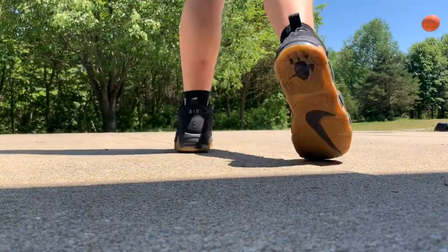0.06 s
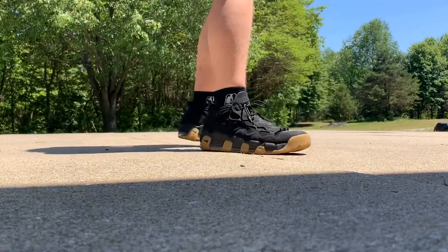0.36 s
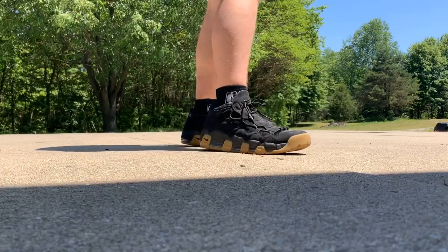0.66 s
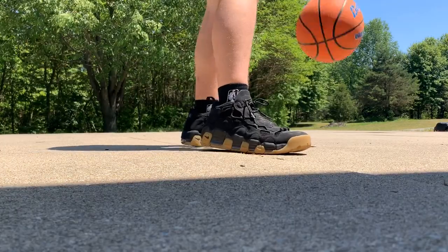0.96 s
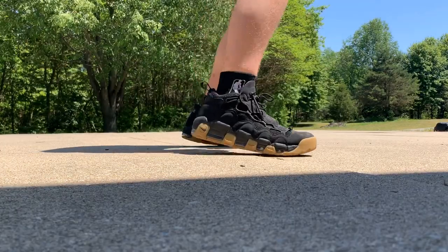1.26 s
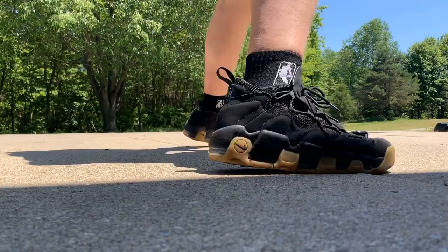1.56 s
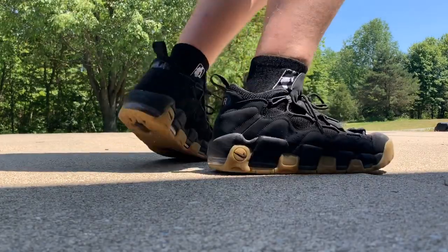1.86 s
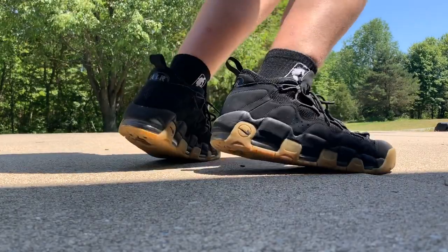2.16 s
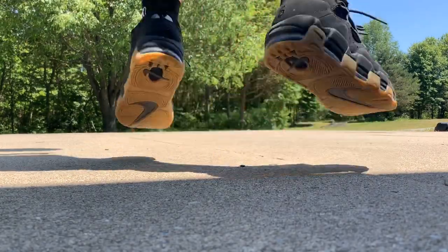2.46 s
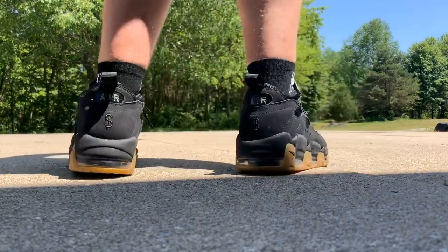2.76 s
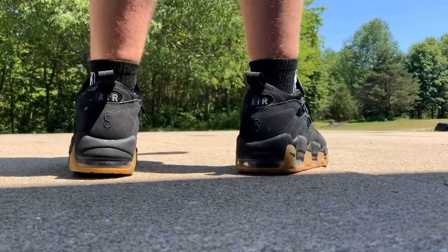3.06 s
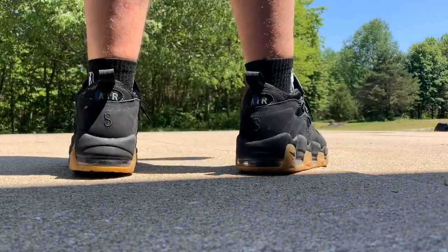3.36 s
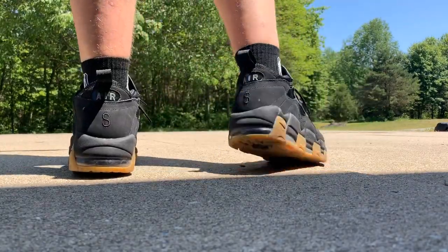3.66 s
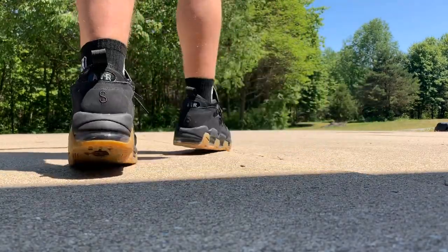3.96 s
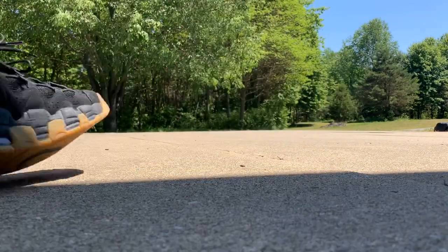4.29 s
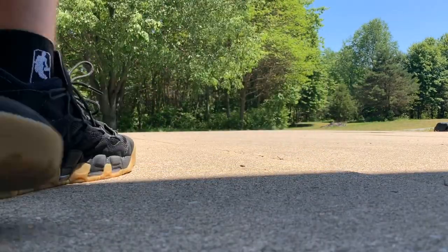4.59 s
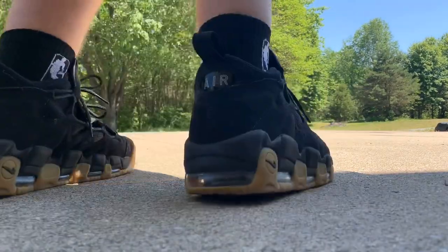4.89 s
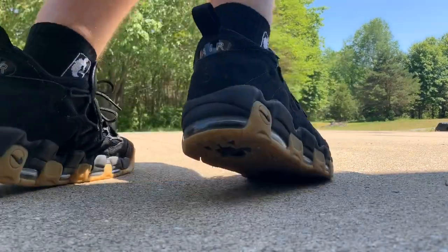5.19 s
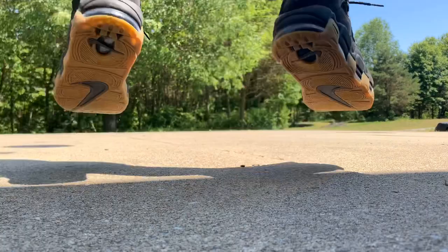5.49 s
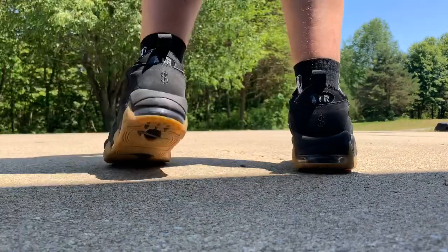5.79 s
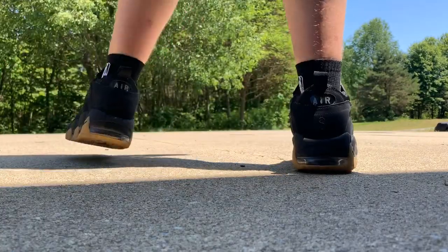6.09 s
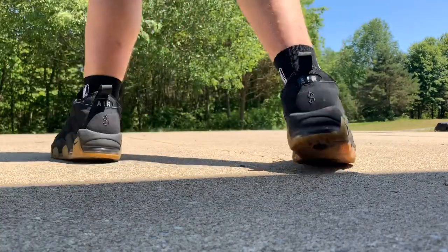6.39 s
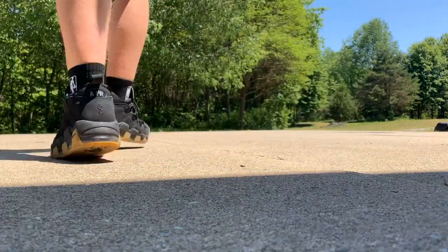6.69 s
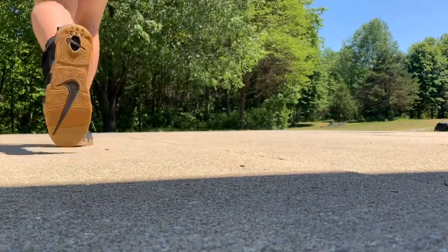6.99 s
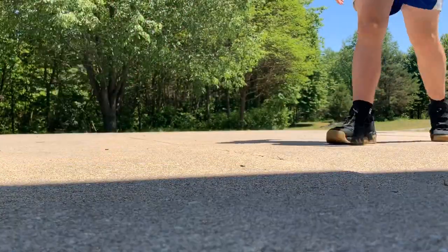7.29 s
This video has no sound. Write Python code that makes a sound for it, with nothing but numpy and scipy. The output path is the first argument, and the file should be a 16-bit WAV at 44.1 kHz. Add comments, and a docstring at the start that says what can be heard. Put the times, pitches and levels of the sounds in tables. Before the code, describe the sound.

The sound is heard from the ground on an outdoor asphalt court, with a faint engine hum, leaf hiss and occasional small bird chirps throughout. It opens with a gritty scuff, a soft distant ball bounce and light steps. At 1 second a basketball smacks down close by, loud, with a hollow ring and short echo. Sneakers step and grind on grit from 1.4 seconds, then land from a jump at 2.6. Around 3.7 seconds the ball knocks the rim farther away three quick times, rattling it. Close steps, scrapes and snapping bits of stone follow from 4.3 to 5.4 seconds, and both feet land with a hard slap at about 5.7. After more scuffing, the ball thuds against the hoop at 6.6 seconds, shaking board and fittings. A distant bounce echoes at 7.1, with some last crunching scuffs and a soft step.

```python
"""Basketball practice on asphalt

Heard from the ground beside the player: rubber soles thump, slap and grind on grit through two jump
shots. The ball bounces and rings close by; far bounces are mostly court echo. Each shot shakes the
rim, board and fittings. A distant engine hums, leaves hiss, small birds call, faint tones swell."""
import sys
import numpy as np
from scipy import signal
from scipy.fft import rfft, irfft, next_fast_len
from scipy.io import wavfile
from scipy.ndimage import uniform_filter1d

SR = 44100
rng = np.random.default_rng(int(sys.argv[2]) if len(sys.argv) > 2 else 0)


def to_wav(sig):
    """Store sig (one row per channel, or 1-D mono) as 16-bit WAV at the path in sys.argv[1].

    Samples outside -1..1 are clipped; the rate is SR.
    """
    pcm = np.clip(np.atleast_2d(sig), -1, 1) * 32767
    pcm = np.round(pcm).astype(np.int16)
    wavfile.write(sys.argv[1], SR, pcm.T)  # frames by channels


N = 328545
TIME = np.arange(N) / SR

# footfalls: t/s, heel thump/dB, thump f/Hz, slap/dB, weight thud re heel/dB, crushed grit/dB
FOOTFALLS = [(0.395, -29, 294, -64, -6, -94), (0.5134, -35.5, 580, -51, 1.5, -78),
             (1.434, -31, 197, -49, -12, -71), (1.4553, -25.5, 365, -60, -13, -57.5),
             (1.7972, -23.5, 262, -53, -15, -53.5), (2.6112, -23, 680, -30.5, -11, -60.5),
             (2.615, -15.5, 238, -51, -19.5, -71), (2.6266, -35, 410, -50, -10, -66),
             (4.164, -39.5, 500, -44, 2.5, -76), (4.355, -23, 253, -39, -10.5, -55.5),
             (4.394, -35.5, 610, -38, -3.5, -55), (4.817, -29.5, 236, -33.5, -31, -57),
             (4.8225, -35.5, 800, -36, -7, -75), (4.836, -24, 172, -44, -21, -85),
             (4.927, -43.5, 500, -63.5, -9, -71.5), (5.6496, -11.5, 373, -13, -10, -52.5),
             (5.6598, -20.5, 532, -28.5, -16.5, -61), (5.6993, -33.5, 720, -49, -23, -70),
             (6.305, -43.5, 245, -76.5, -1.5, -94), (6.32, -49.5, 750, -76, -1.5, -91),
             (7.436, -42, 436, -55, -9, -77)]


def from_db(db):
    """Decibels to gain."""
    return np.exp(np.asarray(db) * (np.log(10) / 20))


def rms_one(x):
    """Scale to rms 1."""
    return x / np.sqrt(np.mean(x ** 2) + 1e-20)


def in_time(rows):
    """Columns of a (t/s, values...) table at every sample."""
    times_s, *columns = np.transpose(rows)
    return [np.interp(TIME, times_s, column) for column in columns]


def at_hz(points, hz):
    """Read a table on a log-frequency axis."""
    points_hz, values = np.transpose(points)
    return np.interp(np.log(hz), np.log(points_hz), values)


def band(x, low_hz, high_hz):
    """Causal band-pass."""
    sos = signal.butter(2, [low_hz, min(high_hz, .48 * SR)], "band", fs=SR, output="sos")
    return signal.sosfilt(sos, x + 1e-18)


def pole_pair(hz, width_hz):
    """Filter denominator of one resonance."""
    radius = np.exp(-np.pi * width_hz / SR)
    return [1, -2 * radius * np.cos(2 * np.pi * hz / SR), radius * radius]


def resonate(x, hz, width_hz):
    """Resonance with peak gain 1."""
    poles = pole_pair(hz, width_hz)
    return signal.lfilter(np.array([1, 0, -1]) * (1 - poles[2]) / 2, poles, x)


def add(track, at_s, db, sound):
    """Mix in a short sound with a gain of db."""
    i = max(round(at_s * SR), 0)
    track[..., i:i + sound.shape[-1]] += from_db(db) * sound[..., :N - i]


def swell(peak_s, rise_s, fall_s):
    """Exponential rise to 1, exponential fall."""
    return np.exp(-np.minimum(np.maximum((peak_s - TIME) / rise_s, (TIME - peak_s) / fall_s), 40))


def wander(per_s):
    """Random curve, spread about 1, per_s new values a second."""
    knots = rng.standard_normal(4000)
    return np.interp(TIME * per_s, np.arange(len(knots)), knots)


def colour(source, spectrum):
    """Two unrelated signals to a stereo pair with this spectrum; rms 1."""
    # left-right likeness: f/Hz, correlation
    likeness = [(60, 0.86), (200, 0.91), (500, 0.08), (1000, 0.017), (3000, 0.063), (6000, 0.073),
                (9000, 1), (15000, 0.36)]
    length = source.shape[-1]
    size = next_fast_len(length)
    hz = np.maximum(np.arange(size // 2 + 1) * SR / size, 1)
    skirts = np.minimum(hz / spectrum[0][0], 1) ** 2 * np.minimum(spectrum[-1][0] / hz, 1) ** 2
    mid, side = rfft(source, size) * from_db(at_hz(spectrum, hz)) * skirts
    alike = np.clip(at_hz(likeness, hz), 0, .99)
    pair = np.sqrt(1 + alike) * mid + np.sqrt(1 - alike) * side * [[1], [-1]]
    return rms_one(irfft(pair, size)[:, :length])


def noise(spectrum, size=N):
    """Shaped stereo noise, rms 1."""
    return colour(rng.standard_normal((2, size)), spectrum)


def grains(per_s, spread_db):
    """Random clicks, a few larger than the rest."""
    sizes = from_db(spread_db * np.minimum(rng.standard_exponential(N), 4))
    return (rng.random(N) < per_s / SR) * sizes * np.sign(rng.random((2, N)) - .5)


def thump(hz, rise_cycles, glide):
    """Cushioned blow: swells and sinks in pitch as the contact patch spreads."""
    age = np.arange(round(.12 * SR)) / SR * hz / rise_cycles
    pitch_hz = hz * (1 + glide * (np.exp(-age) - np.exp(-1.4)))
    return np.sin(2 * np.pi * np.cumsum(pitch_hz) / SR) * (age * np.exp(1 - age)) ** 2


def crack(low_hz, high_hz, decay_s, stereo=.4):
    """Short noise burst, peak roughly 1."""
    t = np.arange(round(.02 * SR)) / SR
    mid, side = rng.standard_normal((2, len(t))) * np.exp(-t / decay_s)
    burst = band(mid + stereo * side * np.array([[1], [-1]]), low_hz, high_hz)
    return burst / np.sqrt(np.sum(burst ** 2) / (decay_s * SR)) / 2


def shaken(modes):
    """Dense small impulses keep a set of resonances going."""
    chatter = grains(per_s=1500, spread_db=1) + 1e-18
    ringing = sum(from_db(db) * resonate(chatter, hz, width_hz) * (-1) ** k
                  for k, (hz, width_hz, db) in enumerate(modes))
    return colour(ringing, [(70, 0), (3000, 0)])


def from_left(x, pan_db, lead_s):
    """Mono to stereo, louder and sooner on the left."""
    delayed = np.interp(TIME - lead_s, TIME, x)
    return np.array([x * from_db(pan_db / 2), delayed * from_db(-pan_db / 2)])


def lean_left(x, hz, width_hz, db):
    """Tilt one band to the left."""
    return x + (from_db([[db / 2], [-db / 2]]) - 1) * resonate(x, hz, width_hz)


def engine():
    """Distant engine: wavering fundamental and octave."""
    # hum: t/s, f/Hz, fundamental/dB, octave/dB
    hum = [(0, 67.83, -55.5, -57.5), (.9, 78.45, -51, -83), (1.9, 71.74, -80, -65),
           (2.5, 67.73, -77, -51.5), (4.0, 68.04, -64, -59.5), (4.08, 53.77, -57.5, -68),
           (7.45, 53.5, -55, -57.5)]
    hz, fundamental_db, octave_db = in_time(hum)
    phase = 2 * np.pi * np.cumsum(hz) / SR + .43 * wander(per_s=2.5)
    return sum(from_db(db + 2.5 * wander(per_s=9)) * np.sin(k * phase)
               for k, db in [(1, fundamental_db), (2, octave_db)])


def open_air():
    """Far rumble and leaf hiss."""
    # background: t/s, rumble/dB, leaves/dB
    levels = [(0, -53, -65), (.5, -48.5, -80), (1.4, -49, -73), (3.2, -50, -79.5), (4.1, -51, -69.5),
              (4.7, -52.5, -73.5), (5.5, -54, -89), (5.85, -53.5, -72.5), (6.2, -56.5, -90),
              (6.45, -53.5, -69.5), (7.45, -55.5, -77)]
    # spectra: f/Hz, density/dB
    rumble_spectrum = [(15, -64), (25, -27.5), (35, -15), (58, 0.5), (80, 3), (108, -11), (140, -5.5),
                       (180, -15), (243, -15), (459, -16.5), (631, -19), (831, -17.5), (1440, -24.5),
                       (2000, -27.5), (2600, -35.5), (3200, -58), (5200, -91.5), (8800, -120)]
    leaf_spectrum = [(2500, 7), (3800, -0.5), (7000, -10), (9000, -11.5), (11000, -11), (13000, -18.5),
                     (16000, -27)]
    rumble_db, leaf_db = in_time(levels)
    return from_db(rumble_db) * noise(rumble_spectrum) + from_db(leaf_db) * noise(leaf_spectrum)


def pebbles(clicks, low_hz, high_hz, q, clump_db, sizes):
    """Clicks dealt to grit sizes; each size rings at its own pitch, in its own clumps."""
    dealt = rng.integers(0, sizes, N)
    return sum(resonate(clicks * (dealt == k) + 1e-18, hz, hz / q) * from_db(clump_db * wander(per_s=86))
               for k, hz in enumerate(np.geomspace(low_hz, high_hz, sizes)))


def jerks(slip):
    """Grit gain: follows the sole's jerky slip and also gives way on its own."""
    return rms_one(from_db(2.2 * slip + 2.2 * wander(per_s=450)))


def grit():
    """Landing and sliding rubber rubs and rolls a bed of sand and gravel."""
    # drags and push-offs (the row at 4.43 s is a soft hiss trailing the sharp snap at 4.39 s): peak t/s,
    # grit/dB, rise/s, fall/s, coarse re fine/dB, rubber/dB
    scuffs = [(.026, -56, 0.017, 0.0099, 3, -50), (1.22, -73, .03, 0.018, -14, -64),
              (1.861, -63, 0.017, 0.037, 7, -60), (2.305, -58.5, 0.018, 0.035, -3, -47.5),
              (2.364, -54, 0.011, 0.012, 2, -48), (2.665, -62, 0.033, 0.034, 4, -47.5),
              (2.721, -61, .01, 0.012, -3, -60), (2.948, -99, 0.033, 0.021, 2, -53.5),
              (3.5, -81, 0.035, 0.1, 3, -54.5), (3.618, -60, 0.01, 0.031, -9.5, -74),
              (4.402, -49.5, .002, 0.004, -2.5, -39), (4.43, -69, .02, 0.079, 12, -69.5),
              (4.833, -38, 0.0046, 0.0024, -7, -37), (5.07, -70.5, 0.12, 0.16, 3, -66.5),
              (5.327, -59, .002, 0.0033, -2, -68), (5.355, -49.5, 0.034, 0.027, 0, -45.5),
              (5.69, -65, 0.02, 0.024, 7.5, -40), (5.824, -51, 0.012, 0.021, 1, -53.5),
              (6.357, -70.5, 0.0051, 0.016, -10.5, -50), (6.458, -52.5, 0.017, 0.018, -3, -47.5),
              (6.94, -49, 0.021, 0.016, -2, -55), (7.253, -48, 0.0011, 0.016, -1.5, -58),
              (7.269, -43.5, 0.0025, 0.012, 14, -48), (7.303, -61, 0.0033, 0.062, 14.5, -53.5)]
    # spectra: f/Hz, density/dB
    sand_spectrum = [(2500, -16.5), (5000, -15.5), (7000, -0.5), (8700, -4), (11300, -3.5), (13200, -9),
                     (15500, -4)]
    gravel_spectrum = [(1100, 5.5), (1800, 0.5), (2700, 5), (4000, 0.5), (5500, -6.5), (8000, -15.5)]
    rubber_spectrum = [(150, 1.5), (400, 3), (650, -3.5), (1100, -10), (1900, -20.5)]
    # each landing is a brief scuff, same columns
    landings = [(at_s + .0021, db, .0058, .024, -1.5, db + 1.5) for at_s, *_, db in FOOTFALLS]
    fine, coarse, rub = np.zeros((3, N))
    for at_s, db, rise_s, fall_s, coarse_db, rub_db in landings + list(scuffs):
        pressure = from_db(db) * swell(at_s, rise_s, fall_s)
        fine += pressure * from_db(-coarse_db / 2)
        coarse += pressure * from_db(coarse_db / 2)
        rub += from_db(rub_db) * swell(at_s, rise_s, 2 * fall_s)
    slip = wander(per_s=200)
    sand = pebbles(grains(per_s=4000, spread_db=3.8), 4500, 14500, q=4, clump_db=2, sizes=7)
    gravel = pebbles(grains(per_s=4000, spread_db=3), 1100, 5500, q=6, clump_db=4, sizes=8)
    crunch = fine * jerks(slip) * colour(sand, sand_spectrum)
    crunch += coarse * jerks(slip) * colour(gravel, gravel_spectrum)
    return crunch + rub * noise(rubber_spectrum)


def stones():
    """Single stones snap, crunch and knock the tread; the asphalt mirrors each click."""
    # stones cracking underfoot: t/s, snap/dB, crunch/dB
    snaps = [(0.027, -23.5, -30), (.251, -40.5, -50), (1.437, -39.5, -59), (1.8615, -33, -43),
             (1.864, -40, -53), (1.892, -46, -44), (2.297, -41, -50), (2.3048, -43, -56),
             (2.3243, -19.5, -22), (2.3315, -25, -43), (2.363, -31, -35), (2.6254, -42, -22.5),
             (2.6354, -32, -31), (2.665, -30.5, -49), (2.6876, -42, -36.5), (3.616, -44, -56),
             (3.921, -47, -62), (4.356, -46, -48), (4.39, -11, -13), (4.599, -48.5, -53),
             (4.7832, -43.5, -59), (4.816, -23, -31), (4.8329, -15.5, -41), (4.835, -28, -34),
             (4.837, -20, -38), (4.992, -39.5, -41), (4.9965, -42, -40), (5.0693, -45, -43),
             (5.0859, -37, -43), (5.172, -33.5, -44), (5.1812, -34, -48), (5.326, -32, -39),
             (5.343, -24, -43), (5.3484, -29, -32), (5.362, -26, -43), (5.819, -35, -35),
             (5.8259, -43, -47), (5.831, -31.5, -39), (5.8468, -41, -35), (6.448, -37, -48),
             (6.4549, -31, -39), (6.4614, -28.5, -30.5), (6.7945, -43, -41), (6.9308, -35, -42),
             (6.938, -38, -36), (6.943, -29, -42), (6.9829, -34.5, -50), (7.2687, -25, -34),
             (7.2823, -34, -26), (7.302, -24, -38), (7.3057, -35, -29), (7.3537, -44, -33)]
    mirror_lags_s = .00022 * rng.uniform(.55, 1.4, len(snaps))
    out = np.zeros((2, N))
    for (at_s, snap_db, crunch_db), lag_s in zip(snaps, mirror_lags_s):
        click = from_db(snap_db) * crack(7000, 11500, decay_s=.00056, stereo=.1)
        click += from_db(crunch_db) * crack(1270, 3500, decay_s=.00045, stereo=.45)
        knock = thump(1250 * rng.uniform(.83, 1.36), rise_cycles=1, glide=.45)
        add(out, at_s, -2.5, click)
        add(out, at_s + lag_s, -2.5, .71 * click)
        add(out, at_s, crunch_db - 15.5, knock)
    return out


def ball():
    """The ball smacks down, flattens with a thud and rings; court and tree line answer."""
    # bounces: t/s, direct/dB, ring/dB, echo/dB, bright echo/dB, echo fall/s
    bounces = [(0.197, -61, -65, -43, -63.5, 0.081), (.999, -6.5, -18.5, -27, -55.5, 0.069),
               (7.111, -41.5, -47, -44, -57.5, 0.13)]
    # shell and inner air: f/Hz, level/dB, t60/s
    modes = [(316.7, -4, 0.26), (539, -7.5, 0.14), (676, -16.5, 0.22), (760, -11, .18), (826, -19.5, 0.26),
             (866, -12.5, .25), (915, -6.5, .3), (983, -18, 0.36), (1082, -17, .5), (1150, -18, 0.24),
             (1276, -23.5, .2), (1610, -12.5, 0.22), (1890, -27.5, .3), (2180, -14, 0.19),
             (2430, -24.5, 0.36), (3260, -32.5, 0.45)]
    # echo spectra: f/Hz, density/dB
    wash_spectrum = [(29, -39), (50, -12), (91, -3), (195, -13.5), (322, -12), (428, -24.5), (941, -17.5),
                     (1200, -23.5), (1700, -28), (2350, -30), (2900, -35.5), (6510, -48.5), (8870, -61.5),
                     (10000, -54.5), (15000, -84.5)]
    bright_spectrum = [(1500, 1.5), (3000, 7), (4600, -2.5), (6000, -30)]
    t = TIME[:SR]
    thuds, out = np.zeros(N), np.zeros((2, N))
    wash, bright = noise(wash_spectrum), noise(bright_spectrum)
    wash += from_db(-8.5) * shaken([(hz, 28, db) for hz, db, _ in modes])  # ball pitches in the echo
    for at_s, db, ring_db, echo_db, bright_db, fall_s in bounces:
        add(out, at_s, db - 2.5, crack(1320, 2200, decay_s=.004, stereo=.35))
        add(out, at_s, db - 12.5, crack(3400, 12500, decay_s=.0015, stereo=.13))
        add(thuds, at_s, db - 1.5, thump(927, rise_cycles=1.7, glide=.23))
        add(thuds, at_s + .0012, db - 13.5, thump(641, rise_cycles=1.2, glide=.54))
        add(thuds, at_s + .002, db - 8, thump(255, rise_cycles=1, glide=2.4))
        add(thuds, at_s + .0023, db - .6, thump(102, rise_cycles=1.14, glide=1.61))
        slapback = band(crack(693, 2000, decay_s=.007), 600, 2200)
        add(out, at_s + .038, db - 18, slapback)
        for hz, mode_db, t60_s in modes:
            # not quite round: each mode splits into a beating pair
            offset = rng.uniform(0, 2 * np.pi) + rng.normal(0, .97, (2, 1))
            phase = 2 * np.pi * hz * t
            pair = np.sin(phase + offset) + .3 * np.sin(1.0049 * phase + offset)
            add(out, at_s, ring_db + mode_db - .5, from_db(-60 * t / t60_s) * pair)
        answer = swell(at_s + .0031, rise_s=.0057, fall_s=fall_s)
        answer += from_db(-14.5) * swell(at_s + .242, rise_s=.06, fall_s=.025)
        out += answer * (from_db(echo_db) * wash + from_db(bright_db) * bright)
    return out + from_left(thuds, pan_db=1, lead_s=.00009)


def tones():
    """Faint pure tones swell, waver and fade."""
    # thin tones: peak t/s, f/Hz, level/dB, rise/s, fall/s
    notes = [(0.219, 2093, -51, 0.023, 0.072), (1.24, 4360, -71, 0.12, 0.087),
             (1.39, 2800, -66, 0.079, 0.054), (1.51, 2820, -70, 0.027, .08),
             (4.135, 2840, -61.5, 0.023, .04), (4.25, 2840, -74.5, .04, 0.1)]
    out = np.zeros(N)
    for at_s, hz, db, rise_s, fall_s in notes:
        envelope = from_db(db + 2 * wander(per_s=17)) * swell(at_s, rise_s, fall_s)
        out += envelope * np.sin(2 * np.pi * hz * TIME)
    return out


def soles():
    """The heel slaps and thumps, the shoe shudders; the weight follows with a deeper thud."""
    thumps, slaps = np.zeros(N), np.zeros((2, N))
    for at_s, heel_db, hz, slap_db, weight_db, _ in FOOTFALLS:
        weight_s = at_s + 3.395 / hz  # softer steps take longer
        add(thumps, at_s, heel_db, thump(hz, rise_cycles=1.1, glide=2.05))
        add(thumps, weight_s, heel_db + weight_db, thump(.37 * hz, rise_cycles=.82, glide=1))
        add(slaps, at_s, slap_db, crack(2500, 4800, decay_s=.00057, stereo=.63))
        add(slaps, at_s, slap_db - 1.5, crack(720, 1440, decay_s=.0022))
        shudder = crack(.86 * hz, 1.88 * hz, decay_s=.015, stereo=.17)
        add(slaps, at_s + .002014, heel_db - 7, shudder)
    return from_left(thumps, pan_db=2.2, lead_s=.00008) + slaps


def song_envelope(start_s, period_s, hold_s, growth_db, count):
    """Evenly repeated held notes, each louder than the last."""
    onsets_s = start_s + period_s * np.arange(count) - hold_s / 2
    return sum(from_db(k * growth_db) * swell(np.clip(TIME, at_s, at_s + hold_s), .025, .036)
               for k, at_s in enumerate(onsets_s))


def birds():
    """Falling chips, smeared by the trees; another bird repeats one fluttering note."""
    # chips: peak t/s, f/Hz, level/dB, rise/s, fall/s
    chips = [(.606, 7020, -66.5, 0.0022, 0.029), (3.323, 7000, -66, .0042, 0.028),
             (3.827, 5780, -60.5, 0.013, 0.028)]
    drop_hz, drop_s, flutter_hz, song_hz = 150, .0087, 70, 4900
    hiss, flutter, out = rng.standard_normal(N), wander(per_s=180), np.zeros(N)
    for at_s, hz, db, rise_s, fall_s in chips:
        pitch_hz = hz + drop_hz * np.clip((at_s - TIME) / drop_s, 0, 2) + flutter_hz * flutter
        whistle = np.sin(2 * np.pi * np.cumsum(pitch_hz) / SR)
        smear = rms_one(band(hiss, hz - 170, hz + 170))
        out += from_db(db) * swell(at_s, rise_s, fall_s) * (whistle + smear)
    repeats = song_envelope(start_s=1, period_s=.372, hold_s=.11, growth_db=1.2, count=5)
    note = rms_one(band(hiss, song_hz - 150, song_hz + 150))
    return out + from_db(-85 + 2.5 * flutter) * repeats * note


def shake(at_s, attack_s, hold_s, t60_s):
    """Envelope: reaches 1 at at_s, holds, decays."""
    onset = np.clip((TIME - at_s) / attack_s + 1, 0, 1)
    return onset * from_db(-60 * np.clip((TIME - at_s - hold_s) / t60_s, 0, 2))


def hoop():
    """The ball knocks the rim and thuds on the board; board, rim and fittings shake on."""
    # hits: t/s, board/dB, rattle/dB, board hold/s, rim/dB, knock/dB, thud/dB
    hits = [(3.68, -37.5, -49.5, 0.049, -47.5, -36.5, -34), (3.744, -46.5, -56, 0.052, -46.5, -60, -48),
            (3.811, -43.5, -53.5, 0.0075, -53, -43, -50), (6.627, -28.5, -40, 0.043, -42, -23.5, -17.5),
            (6.872, -54, -56, .005, -59, -56, -55)]
    # modes of board with pole, and of rim: f/Hz, width/Hz, level/dB
    board_modes = [(95, 14.5, 4), (174, 52, -2.5), (204.6, 16.3, 6.5), (285, 25, -6.5), (330, 44, -7.5),
                   (416.7, 27, -3), (500, 124, -13.5), (726, 48, -16.5), (852, 49, -16)]
    rim_modes = [(558, 71, -2.5), (700, 96, -4.5), (867, 61, -0.5), (1175, 51, -5.5), (1330, 60, -8),
                 (1663, 14, -8.5), (2060, 110, -16.5), (2473, 31, -11.5), (2710, 70, -15)]
    # fittings: f/Hz, density/dB
    rattle_spectrum = [(600, 5.5), (1000, 5.5), (2000, -7.5), (4000, -9), (6500, -11), (9000, -20),
                       (15000, -28.5)]
    attack_s = .0025
    board, rim = shaken(board_modes), shaken(rim_modes)
    rattle = colour(grains(per_s=3900, spread_db=1.5), rattle_spectrum)
    out = np.zeros((2, N))
    for at_s, board_db, rattle_db, hold_s, rim_db, knock_db, thud_db in hits:
        add(out, at_s - attack_s, knock_db, crack(500, 6700, decay_s=.0033))
        add(out, at_s - attack_s, knock_db - 2.5, thump(800, rise_cycles=1.44, glide=1.03))
        add(out, at_s + .0063, thud_db, thump(259, rise_cycles=1.06, glide=2.24))  # board gives way
        add(out, at_s + .018, thud_db, thump(96, rise_cycles=.7, glide=.78))  # pole booms
        out += from_db(board_db) * shake(at_s, attack_s, hold_s, t60_s=.56) * board
        metal = from_db(rattle_db) * rattle + from_db(rim_db) * rim
        out += shake(at_s, attack_s, .36 * hold_s, t60_s=.51) * metal
    return out


def court(x, early_db, early_t60_s, late_db, late_t60_s):
    """Scattered reflections: a quick spray from nearby, a faint tail from the trees."""
    # reflections: f/Hz, density/dB
    spectrum = [(80, -2), (300, 1.5), (1000, 7), (3000, 5), (8000, -4), (15000, -24)]
    t = TIME[:SR]
    arriving = np.clip((t - .008) / .004, 0, 1)
    envelope = sum(from_db(db) * rms_one(arriving * from_db(-60 * t / t60_s))
                   for db, t60_s in [(early_db, early_t60_s), (late_db, late_t60_s)])
    response = noise(spectrum, size=SR) * envelope / np.sqrt(SR)
    return signal.fftconvolve(x, response, axes=1)[:, :N]


def port(x, hz, width_hz):
    """Microphone port: turns the phase around its resonance (all-pass)."""
    poles = pole_pair(hz, width_hz)
    return signal.lfilter(poles[::-1], poles, x)


def scene():
    """Shoes and ball with court reflections; hoop, birds, tones and background beyond."""
    shoes = lean_left(soles() + grit() + stones(), hz=1150, width_hz=460, db=6.5)
    near = shoes + ball()
    far = hoop() + birds() + tones() + lean_left(engine() + open_air(), hz=480, width_hz=360, db=6)
    return near + court(near, early_db=-21.5, early_t60_s=.36, late_db=-28, late_t60_s=.62) + far


def record(dry):
    """Port phase shifts, two brief dropouts, steep low-pass."""
    # dropouts: start/s, end/s
    dropouts = [(.131, .196), (4.003, 4.074)]
    cutoff_hz = 16300
    gate = np.ones(N)
    for start_s, end_s in dropouts:
        gate[(TIME > start_s) & (TIME < end_s)] = from_db(-59)
    left = port(port(dry[0], hz=8500, width_hz=2470), hz=13500, width_hz=830)
    right = port(dry[1], hz=1880, width_hz=460)
    gated = np.array([left, right]) * uniform_filter1d(gate, size=100)
    return signal.sosfilt(signal.ellip(10, .3, 80, cutoff_hz, fs=SR, output="sos"), gated)


dry = scene()
out = record(dry)
to_wav(out)
```